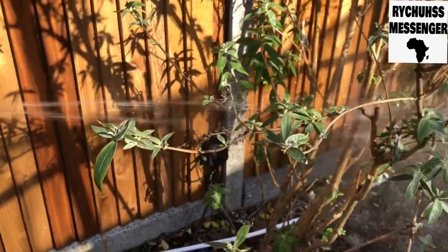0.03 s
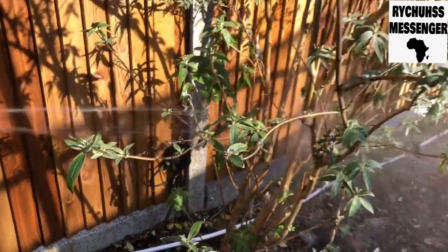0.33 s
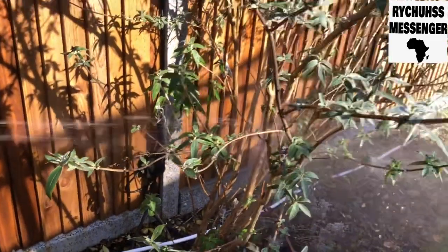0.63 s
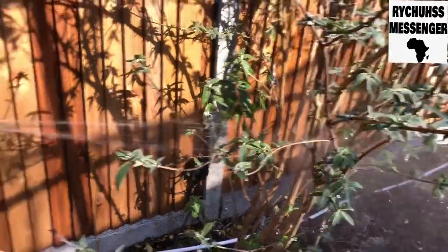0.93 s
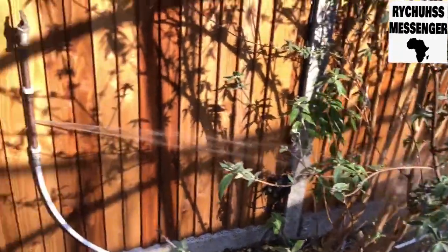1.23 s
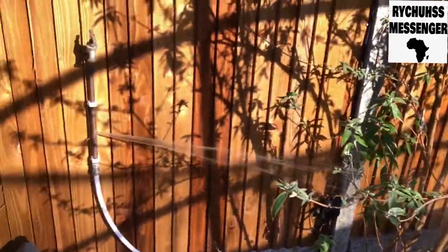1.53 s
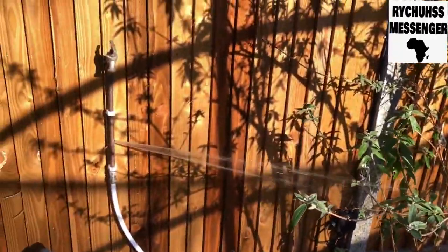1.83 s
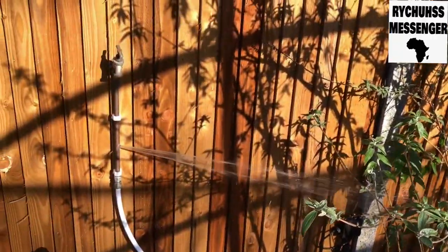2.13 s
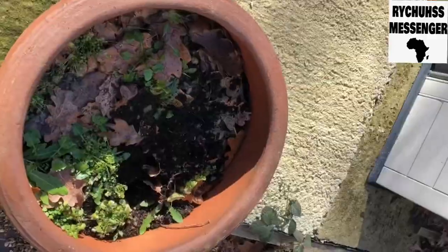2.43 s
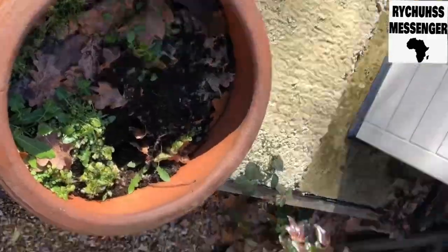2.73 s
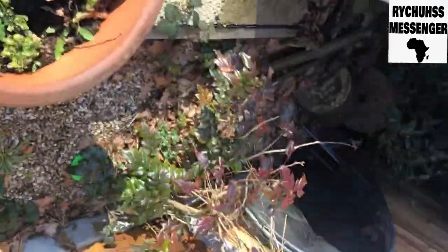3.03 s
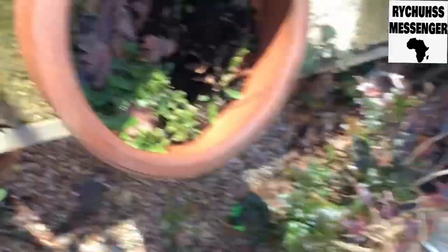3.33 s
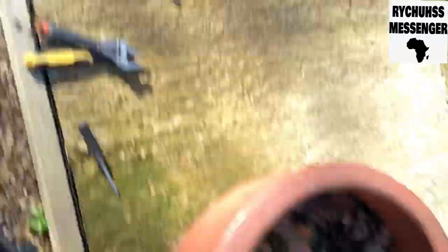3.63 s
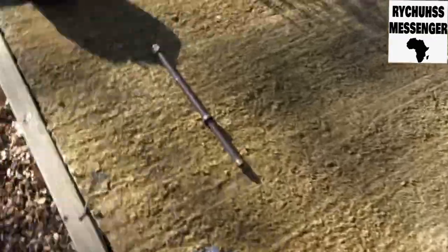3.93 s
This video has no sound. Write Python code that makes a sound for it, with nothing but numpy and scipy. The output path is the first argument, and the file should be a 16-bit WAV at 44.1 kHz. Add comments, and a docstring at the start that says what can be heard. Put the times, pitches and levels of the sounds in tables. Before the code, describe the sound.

Water sprays from a burst pipe onto leaves and a fence, then cuts to quiet rustling.

```python
"""A jet from a split garden pipe sprays against leaves and a wooden fence. Thousands of drops snap
in uneven surges, over the thin hiss of the split and the dull patter of the boards.
After 2.2 seconds the scene cuts abruptly from the spray to the low hum of a quiet garden.
A far bird chirps twice while someone walks along, with rustles, scuffs and the ticks and bumps
of something carried in the hand. A brighter scrape swells up close by at the very end."""
import sys
import numpy as np
from scipy import signal
from scipy.fft import rfft, irfft
from scipy.io import wavfile
from scipy.ndimage import uniform_filter1d

SR = 44100
rng = np.random.default_rng(int(sys.argv[2]) if len(sys.argv) > 2 else 0)


def transcribe(signal):
    """Save signal, clipped to [-1, 1], as a 16-bit WAV file at the path in sys.argv[1]."""
    frames = np.atleast_2d(signal).T
    limited = np.clip(frames, -1, 1)
    pcm = np.round(limited * 32767).astype(np.int16)
    wavfile.write(sys.argv[1], SR, pcm)


N = 176400
T = np.arange(N) / SR
CUT_S, CUT_FADE_S = 2.2005, 0.0011  # when the scene cuts, and how fast

# How hard the jet lands: t/s, level/dB
JET_FORCE = [(0.01, -19.5), (0.03, -24), (0.04, -19.5), (0.07, -24.5), (0.14, -21), (0.15, -25.5),
             (0.28, -20.5), (0.31, -33.5), (0.32, -23.5), (0.42, -28), (0.44, -23), (0.67, -25.5),
             (0.72, -25.5), (0.73, -22), (0.73, -25), (0.74, -37), (0.75, -24), (0.77, -28), (0.81, -22),
             (0.83, -28), (0.89, -24), (0.97, -24), (1.0, -30.5), (1.04, -18.5), (1.06, -28.5), (1.1, -20),
             (1.13, -23), (1.15, -29.5), (1.16, -21), (1.2, -22.5), (1.24, -32), (1.25, -24.5), (1.4, -24),
             (1.46, -36.5), (1.48, -25), (1.5, -31.5), (1.57, -21), (1.6, -27.5), (1.62, -22), (1.67, -26),
             (1.69, -24.5), (1.7, -26.5), (1.77, -21.5), (1.79, -32.5), (1.8, -23), (1.85, -28.5),
             (1.87, -21.5), (1.88, -24), (1.96, -25.5), (1.97, -31.5), (2.01, -22), (2.05, -26),
             (2.15, -29), (2.16, -19.5), (2.18, -29.5), (2.19, -26.5)]
# Bright tone of small drops: f/Hz, level/dB
FINE_TONE = [(1500, -35.5), (4000, -9), (6500, -11.5), (8000, -7), (10000, -1), (12000, 1.5), (13700, 3),
             (15800, 1)]
# Lower tone of larger drops: f/Hz, level/dB
COARSE_TONE = [(800, -31.5), (2000, -14), (2850, -9.5), (3200, -4), (4200, -9.5), (4750, 0), (5400, 0),
               (6500, 2.5), (8000, 3), (10500, -1.5), (16000, -21)]
# Larger drops compared with small ones, as the jet moves over leaves and boards: t/s, level/dB
COARSE_MIX = [(0, -9.5), (.3, -8), (.6, -10.5), (.9, -8), (1.1, -9.5), (1.4, -11.5), (1.65, -9.5),
              (1.9, -7.5), (2.2, -9.5)]
# Faint whistles of the split in the pipe: f/Hz, width/Hz, level/dB
WHISTLES = [(1940, 60, -60.5), (3700, 120, -60.5), (4720, 70, -54.5), (7750, 79, -67), (12560, 40, -52),
            (13200, 60, -54)]
# Tone of water on wood and soil: f/Hz, level/dB
BOARD_TONE = [(30, -12.5), (70, -17), (150, -6), (300, -1.5), (550, 4), (750, 1), (950, 2), (1500, 3.5),
              (1950, 2.5), (2350, -1.5), (3500, 0), (7000, -23)]
# Tone of the garden background: f/Hz, level/dB
GARDEN_TONE = [(20, -34), (38, -10), (55, 1), (80, 0), (120, -2.5), (160, -1.5), (250, -5.5), (600, -9.5),
               (1300, -10), (1900, -15), (2700, -25), (5000, -34), (9000, -39), (16000, -41)]
# Lumps of water hitting leaves: t/s, level/dB, decay/s, larger drops compared with small ones/dB
LEAF_SLAPS = [(0.05, -21.5, 0.0073, -4), (0.316, -23, 0.0066, 1), (0.471, -20, 0.0042, -3),
              (0.607, -26, .008, 4.5), (0.648, -25, 0.0077, -1), (1.473, -25.5, 0.0095, -13),
              (1.562, -29.5, 0.0082, 1.5), (1.608, -26, 0.0074, -9)]
# Single big drops close by: t/s, level/dB, f/Hz
CLOSE_DROPS = [(0.279, -11, 12000), (.3157, -6, 12950), (0.3192, -6, 7500), (.377, -5.5, 12900),
               (.526, -1, 13000), (.7292, -1.5, 11000), (1.5697, -3, 8000), (1.5713, -11, 11700),
               (1.6215, -6, 12500), (1.863, -12, 12000)]
# Scuffs, each timed at its loudest point: t/s, level/dB, rise/s, fall/s
SCUFF_STROKES = [(.96, -42.5, 0.063, 0.11), (2.712, -54.5, 0.013, 0.02), (2.995, -51.5, .02, .03),
                 (3.26, -44.5, 0.036, 0.03), (3.305, -43.5, .004, 0.033), (3.398, -47, .01, 0.022),
                 (3.46, -53, .02, 0.048)]
# Tone of a scuff: f/Hz, level/dB
SCUFF_TONE = [(80, -26.5), (220, -7.5), (300, -3.5), (370, 2), (450, -1.5), (560, -3), (600, 0.5),
              (680, -13.5), (850, -3.5), (970, 4), (1080, -6), (1420, -3), (1900, -23), (3100, -18),
              (5000, -34), (16000, -33.5)]
# How loudly the walk rustles: t/s, level/dB
RUSTLE_LEVEL = [(2.22, -75), (2.37, -56.5), (2.5, -79.5), (2.68, -66.5), (2.93, -58), (3.13, -64.5),
                (3.28, -54), (3.48, -51.5), (3.68, -56), (3.9, -55.5), (3.97, -49), (4, -46)]
# Tone of the rustle: f/Hz, level/dB
RUSTLE_TONE = [(100, -23), (300, 5.5), (1200, -0.5), (2200, -4.5), (4000, -6), (7000, -11), (11000, -12.5),
               (16000, -14.5)]
# Ticks and knocks of the carried thing: t/s, level/dB, f/Hz, width/octaves, decay/s
KNOCK_HITS = [(2.2485, -38, 7950, 1.2, 0.0011), (2.313, -44, 6000, 0.61, .001),
              (2.432, -30, 4000, 1, 0.0011), (2.433, -32, 700, 1.1, 0.0056), (2.44, -50, 3800, .6, .001),
              (2.448, -42, 3800, 0.58, .001), (2.458, -36, 10000, .9, .0005), (2.538, -51, 8000, .6, .0005),
              (3.6565, -34, 2520, 0.29, 0.0012), (3.6568, -31, 1260, 0.68, 0.0009),
              (3.690, -39, 1100, .6, .002), (3.692, -38, 420, 0.54, 0.003)]
# Notes of a far bird: t/s, level/dB, rise and fall/s
BIRD_NOTES = [(2.257, -73, 0.021), (2.74, -69, .025)]
# Bumps of the hand: t/s, level/dB, rise and fall/s
HAND_BUMPS = [(2.39, -51, 0.046), (2.553, -60, 0.017), (2.604, -63, 0.011), (2.716, -50.5, 0.025),
              (3.23, -51, 0.067), (3.407, -53, 0.055)]
# Dull tone of a bump: f/Hz, level/dB
BUMP_TONE = [(40, -15.5), (100, -1.5), (160, -1), (230, -6), (400, -8.5), (900, -19), (3000, -46)]
# Tone of the last scrape: f/Hz, level/dB
SCRAPE_TONE = [(100, -17), (300, -13), (520, -3), (700, -2), (950, 0), (1200, -1), (1900, -13), (2400, -17),
               (3100, -15), (4200, -18), (7000, -17), (11000, -15.5), (16000, -14)]


def amp(db):
    """Turns decibels into a number to multiply by."""
    return 10 ** (np.asarray(db) / 20)


def unit(x):
    """Scales a signal to an average strength (rms) of 1."""
    return x / np.sqrt(np.mean(x ** 2) + 1e-20)


def curve(rows):
    """Joins (time, value) points with straight lines."""
    return np.interp(T, *np.transpose(rows))


def swell(at_s, db, width_s):
    """A smooth rise and fall around one moment."""
    return amp(db) * np.exp(-((T - at_s) / width_s) ** 2)


def colour(x, tone, size=4096):
    """Filters a signal to follow a tone table, then scales it to strength 1."""
    hz, db = np.transpose(tone)
    bin_hz = abs(np.fft.fftfreq(size, 1 / SR)) + 1
    log_gain = np.log(amp(np.interp(np.log(bin_hz), np.log(hz), db)))
    response = np.exp(np.conj(signal.hilbert(log_gain)))  # rings after a click, never before
    taps = np.fft.ifft(response).real[:size // 2]
    return unit(signal.oaconvolve(x, taps)[:len(x)])


def wander(hz):
    """A random wobble, up to about the given rate."""
    spectrum = rfft(rng.standard_normal(N))
    return unit(irfft(spectrum / (1 + (np.fft.rfftfreq(N, 1 / SR) / hz) ** 4), N))


def impacts(per_s, spread_db):
    """Random clicks: many small, a few large."""
    size = amp(spread_db * np.minimum(rng.exponential(1, N), 4.5))
    sign = rng.choice([-1, 1], N)
    lands = rng.random(N) < per_s / SR
    return unit(size * sign * lands)


def droplets(per_s, spread_db, pitches=12, ring_s=0.00007):
    """Each drop lands with a tiny snap at one of several pitches."""
    hits = impacts(per_s, spread_db)
    choice = rng.integers(0, pitches, N)
    out, t = np.zeros(N), T[:128]
    shape = t / ring_s * np.exp(-t / ring_s)
    for k, hz in enumerate(np.linspace(1000, 17000, pitches)):
        snap = unit(shape * np.cos(2 * np.pi * hz * (t - ring_s)))
        out += np.convolve(hits * (choice == k), snap)[:N]
    return unit(out)


def spray(clump_db=1.6):
    """Small, larger and a few nearby drops land in clumps as the jet surges."""
    clumps = unit(amp(clump_db * wander(hz=126)))
    small = droplets(per_s=7000, spread_db=3.5)
    nearby = amp(-9.5) * droplets(per_s=200, spread_db=1)
    fine = colour(small + nearby, FINE_TONE)
    coarse = colour(droplets(per_s=3000, spread_db=4), COARSE_TONE)
    surges = amp(curve(JET_FORCE) - 0.2)
    return clumps * surges * (fine + coarse * amp(curve(COARSE_MIX)))


def leak():
    """Water squeezing through the split hisses steadily, with a few fuzzy whistles."""
    out = amp(-38.5) * colour(rng.standard_normal(N), FINE_TONE)
    for hz, width, db in WHISTLES:
        phase = 2 * np.pi * hz * T
        whistle = wander(width / 2) * np.cos(phase) + wander(width / 2) * np.sin(phase)
        out += amp(db) * unit(whistle)
    return out


def boards(follow=0.18):
    """Water patters dully on wood and soil, loosely following the force of the jet."""
    force_db = curve(JET_FORCE)
    patter = colour(impacts(per_s=2500, spread_db=1.62), BOARD_TONE)
    return amp(-45 + follow * (force_db - force_db.mean())) * patter


def fence(x, echo_db=-5, fade_s=0.04, places=16):
    """Adds short echoes from boards and ground; each landing place has its own echo."""
    t, echo = T[:2400], np.zeros(N)
    place = np.repeat(rng.integers(0, places, N // 48 + 1), 48)[:N]  # picked anew every 48 samples
    for k in range(places):
        taps = rng.standard_normal(len(t)) * (t > 0.001) * amp(-60 * t / fade_s)
        share = uniform_filter1d(1. * (place == k), size=12)
        echo += signal.oaconvolve(x * share, taps / np.linalg.norm(taps))[:N]
    return (x + amp(echo_db) * echo) / np.sqrt(1 + amp(echo_db) ** 2)


def garden(first_scene_db=-1.5):
    """Low outdoor noise, a little quieter before the scene cuts and a little louder after."""
    level_db = -52.5 + first_scene_db * (T < CUT_S) + 1.4 * wander(hz=5.6)
    return amp(level_db) * colour(rng.standard_normal(N), GARDEN_TONE)


def slaps():
    """A lump of water slaps the leaves: a sudden crowd of drops that dies away fast."""
    fine = colour(droplets(per_s=8200, spread_db=1.6), FINE_TONE)
    coarse = colour(droplets(per_s=5000, spread_db=2.3), COARSE_TONE)
    out = np.zeros(N)
    for at_s, db, decay_s, coarse_db in LEAF_SLAPS:
        burst = (T >= at_s) * np.exp(-abs(T - at_s) / decay_s)
        out += amp(db) * burst * (fine + amp(coarse_db) * coarse)
    return out


def big_drops(width_s=0.00008):
    """A big drop close by makes one very short crack."""
    return sum(swell(at_s, db, width_s) * np.cos(2 * np.pi * hz * (T - at_s))
               for at_s, db, hz in CLOSE_DROPS)


def scuffs():
    """Someone moving makes grainy scuffs: crowds of tiny clicks that swell and fade."""
    strokes = sum(swell(at_s, db, np.where(T < at_s, rise_s, fall_s))
                  for at_s, db, rise_s, fall_s in SCUFF_STROKES)
    return strokes * colour(impacts(per_s=2500, spread_db=2.7), SCUFF_TONE)


def rustle():
    """Walking rustles softly: clicks so close together that they blur."""
    return amp(curve(RUSTLE_LEVEL)) * colour(impacts(per_s=16000, spread_db=1.8), RUSTLE_TONE)


def knocks(size=4096):
    """The carried thing knocks: a dry click and a brief rattle around one pitch."""
    out, t = np.zeros(N + size), T[:size]
    grid_hz = np.geomspace(40, 20000, 40)
    for at_s, db, hz, octaves, decay_s in KNOCK_HITS:
        push = 0.15 * rng.standard_normal(size) * np.exp(-t / decay_s)  # the rattle
        push[0] += 2  # the click
        band_db = np.maximum(-4 * (np.log2(grid_hz / hz) / octaves) ** 2, -60)
        hit = colour(push, np.c_[grid_hz, band_db])
        out[round(at_s * SR):][:size] += amp(db) * hit / abs(hit).max()
    return out[:N]


def bird(pitch_hz=4480, waver_hz=90):
    """A far bird sings thin, wavering notes."""
    notes = sum(swell(*row) for row in BIRD_NOTES)
    hz = pitch_hz + waver_hz * wander(hz=124)
    return notes * unit(np.sin(2 * np.pi * np.cumsum(hz) / SR))


def bumps():
    """A hand bumps the thing it carries: short swells of dull noise."""
    force = sum(swell(*row) for row in HAND_BUMPS)
    return force * colour(rng.standard_normal(N), BUMP_TONE)


def scrape(full_s=3.975, rise_s=0.043, db=-36.5):
    """A grainy scrape very close by swells and holds to the end."""
    force = np.where(T < full_s, swell(full_s, db, rise_s), amp(db))
    return force * colour(impacts(per_s=7000, spread_db=2.7), SCRAPE_TONE)


def scene():
    """The water until the scene cuts, with the garden, the bird and the person moving."""
    first_scene = np.clip((CUT_S - T) / CUT_FADE_S, 0, 1)
    drops = first_scene * (spray() + slaps() + big_drops())
    echo_cut = np.maximum(first_scene, amp(-22))  # the last echo is turned down when the scene cuts
    water = fence(drops) * echo_cut + first_scene * (leak() + boards())
    mix = water + garden() + bird() + scuffs() + rustle() + bumps() + scrape() + knocks()
    return mix[None]


def record(dry, edge_hz=15760):
    """Cuts away the very highest treble."""
    low_pass = signal.firwin(801, edge_hz, window=("kaiser", 9), fs=SR)
    return signal.oaconvolve(dry, low_pass[None], "same")


dry = scene()
out = record(dry)
transcribe(out)
```